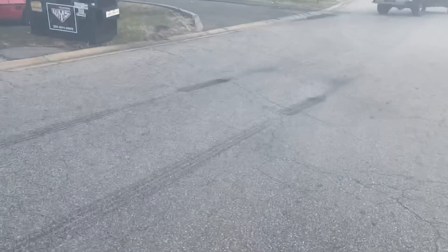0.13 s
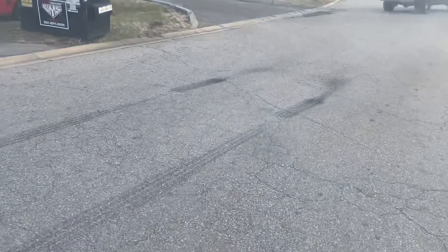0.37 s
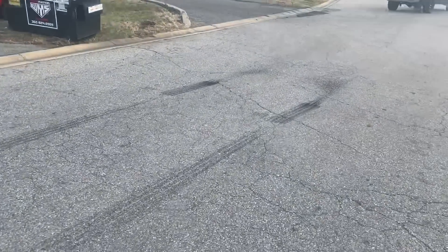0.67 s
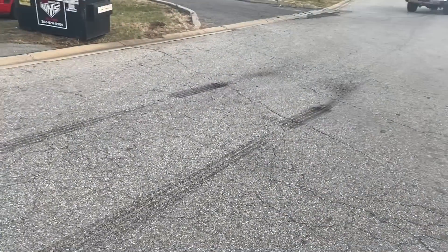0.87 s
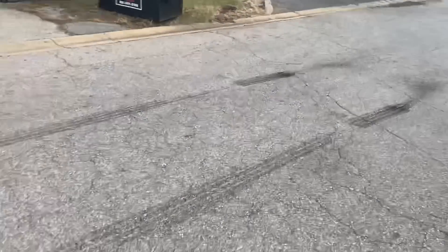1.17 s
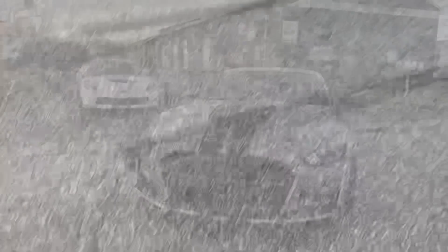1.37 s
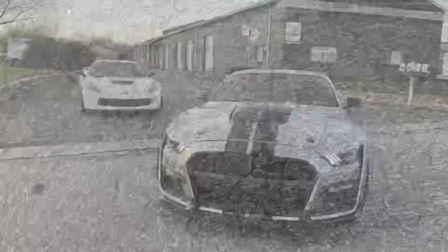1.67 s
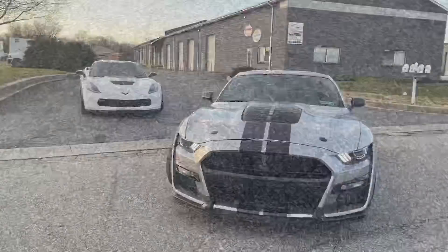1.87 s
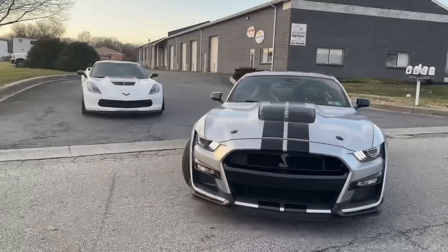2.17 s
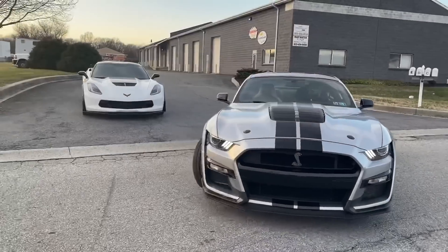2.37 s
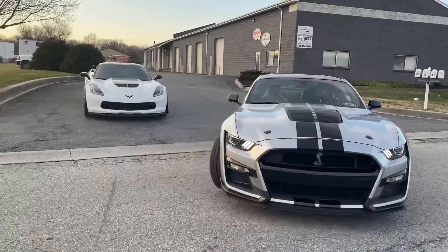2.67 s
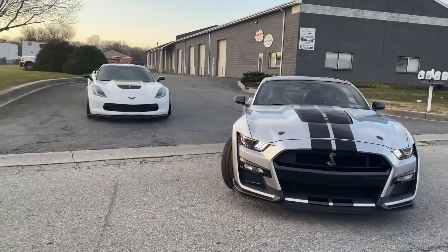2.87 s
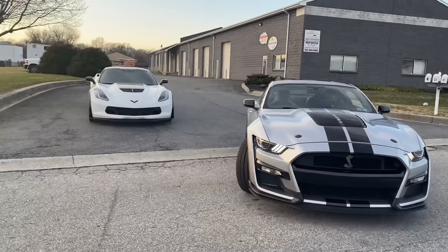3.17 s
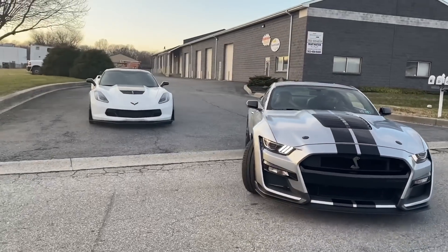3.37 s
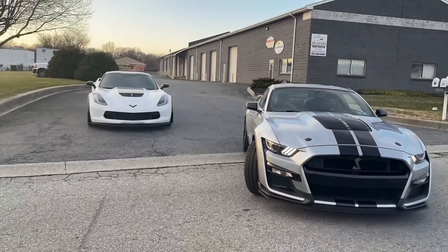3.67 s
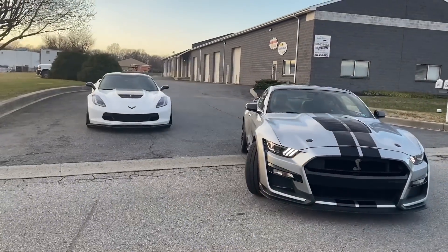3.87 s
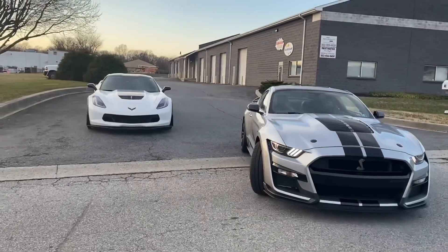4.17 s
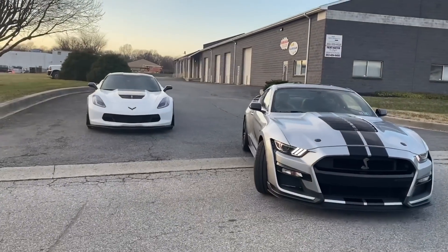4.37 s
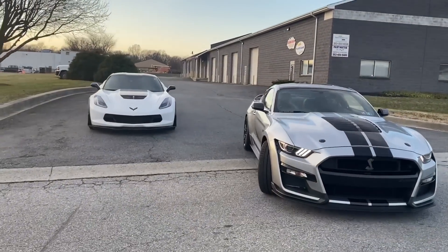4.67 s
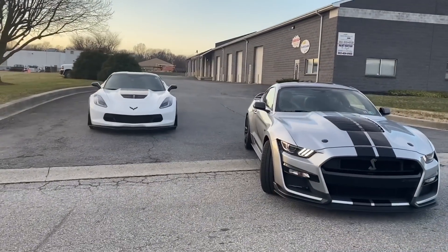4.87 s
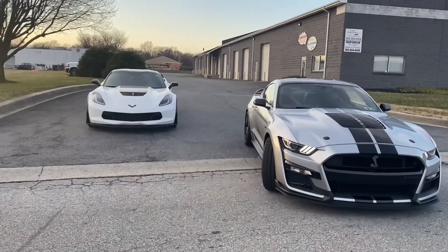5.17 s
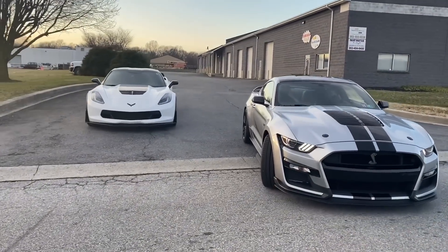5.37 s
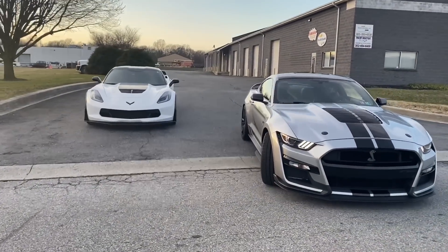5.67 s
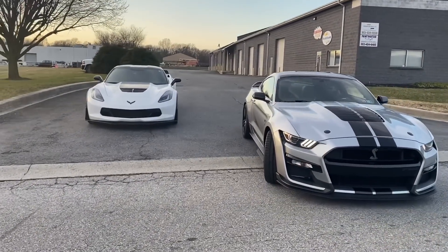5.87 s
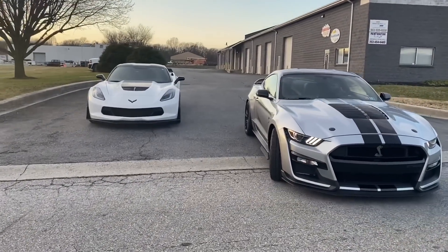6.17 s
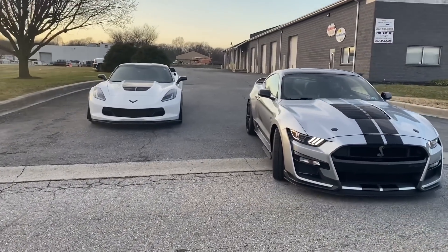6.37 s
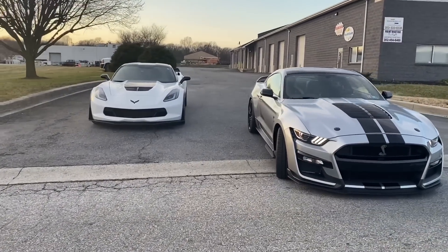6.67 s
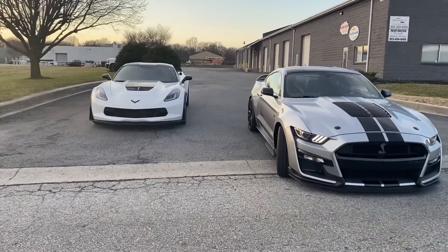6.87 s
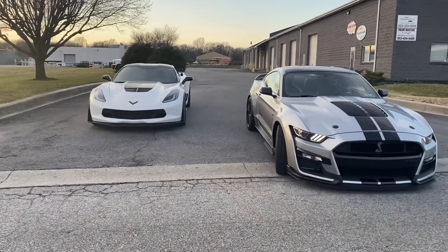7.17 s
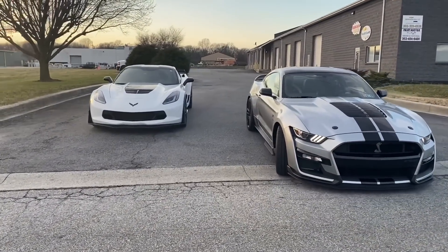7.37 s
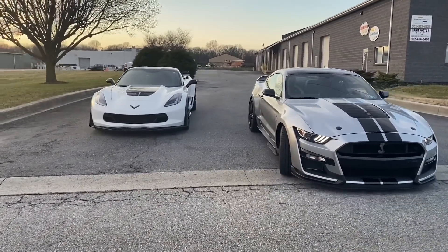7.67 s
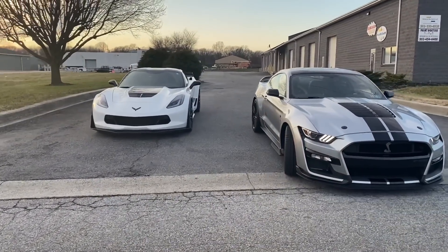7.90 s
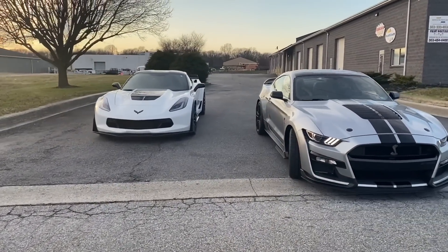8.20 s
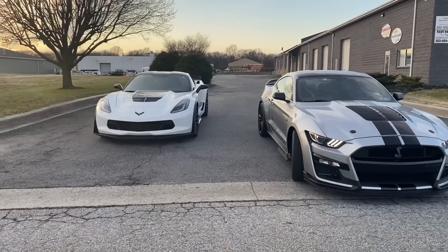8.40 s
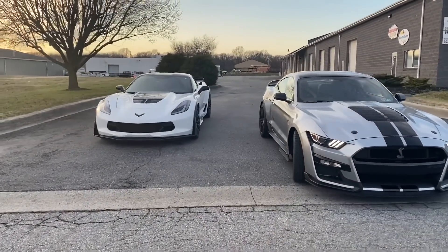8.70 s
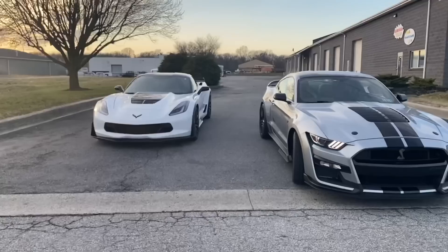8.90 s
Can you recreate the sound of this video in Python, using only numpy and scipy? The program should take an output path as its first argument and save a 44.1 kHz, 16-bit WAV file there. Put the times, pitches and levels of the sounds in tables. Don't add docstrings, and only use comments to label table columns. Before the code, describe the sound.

Outdoors on asphalt, a big engine fades up from near quiet, rumbles unevenly, revs in short muffled surges with exhaust pops between.

```python
import sys
import numpy as np
from scipy import signal
from scipy.fft import rfft, irfft, next_fast_len
from scipy.io import wavfile
from scipy.ndimage import uniform_filter1d

SR = 44100
rng = np.random.default_rng(int(sys.argv[2]) if len(sys.argv) > 2 else 0)


def boost(x):
    u = np.asarray(x, float) / 20
    return 10 ** u


def bounce(signal):
    frames = np.transpose(np.atleast_2d(signal))
    limited = np.clip(frames, -1, 1)
    pcm = np.round(limited * 32767).astype(np.int16)
    wavfile.write(sys.argv[1], SR, pcm)


N = 398663


def evened(x):
    return x / np.sqrt(np.mean(x ** 2) + 1e-20)


def read(points, hz):
    f, value = np.transpose(points)
    return np.interp(np.log(hz + 1), np.log(f + 1), value)


def curve(rows):
    s, value = np.transpose(rows)
    return np.interp(np.arange(N) / SR, s, value)


def drift(hz):
    lowpass = signal.butter(2, hz, fs=SR, output="sos")
    return evened(signal.sosfiltfilt(lowpass, rng.standard_normal(N)))


def colour(x, points):
    log_gain = np.log(boost(read(points, abs(np.fft.fftfreq(32768, 1 / SR)))))
    taps = np.fft.ifft(np.exp(np.conj(signal.hilbert(log_gain)))).real[:8192]
    return signal.oaconvolve(np.atleast_2d(x), taps[None], axes=1)[:, :N]


def resonate(x, hz, width):
    return signal.lfilter(*signal.iirpeak(hz, hz / width, SR), x)


def smoothed_luck(shape, bins, frames):
    luck = uniform_filter1d(rng.standard_normal(shape), size=bins, axis=0)
    return evened(uniform_filter1d(luck, size=frames, axis=1))


def noise(points, gate, patchy_db, ripple_db=0):
    hz, _, z = signal.stft(rng.standard_normal((2, N)) * gate, SR, nperseg=1024)
    patches = smoothed_luck(z.shape[1:], 10, 8)
    ripple = smoothed_luck(z.shape[1:], 2, 90)
    shape_db = read(points, hz)[:, None] + patchy_db * patches + ripple_db * ripple
    return evened(signal.istft(z * boost(shape_db), SR, nperseg=1024)[1][:, :N])


def wavering(lines, spread, sway_db):
    total = np.zeros(N)
    for hz, db in lines:
        level = np.sqrt(2) * boost(db + sway_db * drift(2.8))
        cycles = rng.random() + np.cumsum(hz * (1 + spread * drift(1.93))) / SR
        total += level * np.cos(2 * np.pi * cycles)
    return total


# (frequency [Hz], level [dB per Hz])
FAR_COLOUR = [(12, -54), (20, -24), (69, 2.5), (87, -8.5), (153, -2.5), (184, -25.5), (324, -15),
              (380, -30), (434, -13), (538, -27), (722, -28.5), (1080, -34), (1790, -40.5), (3410, -55),
              (12000, -66), (15600, -94), (22000, -120)]
# (time [s], level [dB])
FAR_SWELL = [(0.0, -62), (0.394, -63), (0.63, -59), (0.682, -64), (0.8, -65), (0.816, -62), (1.11, -63),
             (1.15, -62.5)]


def far_idle():
    highpass = signal.butter(4, 36, "high", fs=SR, output="sos")
    level_db = -55 + 0.64 * (curve(FAR_SWELL) + 59.5)
    return boost(level_db) * signal.sosfilt(highpass, noise(FAR_COLOUR, 1, 1.5))


def far_hum():
    return wavering([(82, -60.0)], 0.017, 1.78)


# (frequency [Hz], level [dB])
BEHIND = [(82, -30), (124, -42)]


def car_behind():
    return boost(1.1) * wavering(BEHIND, 0.0201, 4.1)


def near_fade():
    from_s, fade_s = 1.132, 1
    return np.clip((np.arange(N) / SR - from_s) / fade_s, 0, 1)


# (time [s], share of the way [0-1])
BACKING = [(0, 0.042), (4.2, 0.12), (6.2, 0.97), (9.04, 1)]


def backed_away():
    return curve(BACKING)


# (time [s], distance over the nearest [ratio])
DISTANCE = [(2.4, 0.93), (3.6, 1.35), (4.6, 1.52), (9.04, 1.83)]


def bay_distance():
    return curve(DISTANCE)


# (time [s], speed [firings per s])
COAST = [(1.113, 60.03), (1.63, 55.36), (2.05, 46.16), (2.651, 49.39), (3.195, 44.4), (3.859, 49.16),
         (4.5, 47.13), (4.73, 50.76), (5.39, 58.52), (5.54, 58.9), (5.728, 52.08), (6.483, 56.5),
         (6.866, 51.8), (7.25, 51.39), (7.81, 47.81), (8.59, 58.01), (8.733, 62.66), (8.84, 60.33)]


def coasting():
    return curve(COAST)


# (start [s], length [s], surge [firings per s])
BLIPS = [
    (4.669, 0.72, 11.332),
    (5.73, 0.67, 12.363),
    (7.888, 0.756, 13.693),
    (8.871, 0.75, 7.952),
]


def surge():
    t = np.arange(N) / SR
    extra = np.zeros(N)
    for start, length, top in BLIPS:
        extra += top * np.sin(np.pi * np.clip((t - start) / length, 0, 1) ** 1.04)
    return extra


# (start [s], opening [s], held until after start [s], closing [s], share of full load [ratio])
PEDAL = [
    (4.69, .2, 0.64, 0.035, 1),
    (5.8, 0.11, .48, .1, 0.94),
    (7.92, 0.37, 0.51, 0.19, 1.08),
    (8.93, .12, .4, .1, 0.62),
]


def pedal():
    t = np.arange(N) / SR
    load = np.zeros(N)
    for start, opening, held, closing, share in PEDAL:
        rise = (t - start) / opening
        fall = (start + held + closing - t) / closing
        load += share * np.clip(np.minimum(rise, fall), 0, 1)
    return load


# (frequency [Hz], level [dB])
WHINE = [(605, -47.5), (910, -49), (1173, -63), (1211, -60.5)]


def whine():
    return boost(1.1 - 6.5 * backed_away()) * wavering(WHINE, 0.00498, 2.2)


# (frequency [Hz], level [dB])
HISS_TILT = [(750, -2.5), (2000, 1.5), (3500, 0.5), (5900, 2)]
# (frequency [Hz], level [dB per Hz])
HISS_NEAR = [(440, -21), (750, 3), (884, 0.5), (931, -5), (1030, -8.5), (1210, -1.5), (1410, -7),
             (1540, -5.5), (1750, -9.5), (1890, -11), (2130, -15.5), (3040, -14), (3220, -13.5),
             (4360, -20.5), (5900, -22), (7670, -33), (13000, -120)]
# (frequency [Hz], level [dB per Hz])
HISS_AWAY = [(440, -22), (750, -3), (839, -4), (923, 1), (1040, -6.5), (1510, -7.5), (1750, -13),
             (1890, -10.5), (2360, -14), (2640, -15), (2910, -16), (3400, -14.5), (4710, -22.5),
             (5230, -25), (5900, -26), (7670, -62), (13000, -120)]
# (frequency [Hz], level [dB per Hz])
FIZZ = [(5200, -21), (6100, -2.5), (7000, 0.5), (8500, -2), (10000, -2), (12000, -4), (13500, -5),
        (15300, -6.5), (15700, -42)]


def engine_bay(firings, extra):
    far_db = -20 * np.log10(bay_distance())
    blip = extra / 12
    hiss_db = -34.74 + far_db + 2.5 * blip
    fizz_db = -51 + 0.69 * far_db + 5 * blip
    throb = boost(0.45 * drift(150)) * (1 + 0.027 * np.cos(2 * np.pi * firings))
    near, far = ([(hz, db + read(HISS_TILT, hz)) for hz, db in shape] for shape in (HISS_NEAR, HISS_AWAY))
    away = np.clip(backed_away(), 0, 1)
    hiss = np.sqrt(1 - away) * noise(near, throb, .9, 1.3)
    hiss = hiss + np.sqrt(away) * noise(far, throb, .9, 1.3)
    fizz = noise(FIZZ, boost(0.57 * drift(22)), 1.0, 0.54)
    return boost(hiss_db) * hiss + boost(fizz_db) * fizz


# (time [s], peak level [dB])
POPS = [(3.151, -20), (4.403, -20), (5.17, -18), (5.217, -18), (6.153, -16), (6.72, -21), (7.026, -16),
        (7.182, -15), (7.494, -23), (7.831, -28), (8.001, -17), (8.138, -15), (8.268, -11)]


def pops():
    out, t = np.zeros((2, N)), np.arange(600) / SR
    for s, db in POPS:
        knock = boost(db) * np.sin(2 * np.pi * rng.uniform(550, 800) * t) * np.exp(-t / .0014)
        part = out[:, round(s * SR):][:, :len(t)]
        part += knock[:part.shape[1]]
    return .75 * colour(out, [(200, -20), (500, 0), (900, -2), (2000, -10), (6000, -50)])


# (speed [firings per s], first, second, third firing multiple [dB], lope [dB])
BY_SPEED = [(44.3, -41, -14.6, -21, -20.5), (45.3, -31.5, -12.8, -19.5, -20.5),
            (48.9, -30, -13.5, -21.5, -20.5), (51.6, -25.5, -13.5, -27, -18), (55.4, -22, -16, -27, -16.5),
            (59, -19.5, -16, -34, -16), (59.3, -19.5, -19.5, -44, -15), (69.3, -17, -18.5, -44, -15.5)]
LOADED_DB = [4.1, 5.1, 4.3, .3]
BACKED_DB = [1.5, -1.1, -2.5, -1.6]


def multiples(rate, load):
    hz, *levels = np.transpose(BY_SPEED)
    away = backed_away()
    return [np.interp(rate, hz, db) + loaded_db * load + backed_db * away
            for db, loaded_db, backed_db in zip(levels, LOADED_DB, BACKED_DB)]


def exhaust_boom(firings, faster, first_db, second_db, third_db):
    angle = 2 * np.pi * firings
    boom = boost(first_db) * np.cos(angle + 2.85 - .07 * faster)
    boom += boost(second_db + 0.14 * drift(10)) * np.cos(2 * angle)
    boom += boost(third_db + 1.1 * drift(12)) * np.cos(3 * angle - 1.1 + .19 * faster)
    boom += boost(second_db - 28 + 2.3 * drift(6)) * np.cos(4 * angle)
    return boost(0.16) * np.sqrt(2) * boom


def blows(firings, excess, luck):
    firing = firings.astype(int)
    fires = np.diff(firing, prepend=firing[0])
    return fires * (np.take(excess, firing % len(excess)) + luck[firing])


# (frequency [Hz], gain [dB])
PIPE = [(20, -27), (40, -24), (55, -19), (66, -5), (76, -2), (100, -2), (112, -5.5), (124, -6), (138, -3),
        (152, -5), (172, -14), (210, -18), (250, -40), (900, -100)]
IDLE_EXCESS = [-1.35, -.8, -1, 2.1, .85, .35, -1.25, 1.1]
LOAD_EXCESS = [-.5, -1.2, -1.2, .95, .5, -.25, -.45, 2.15]


def exhaust_lope(firings, faster, lope_db, luck):
    load = np.clip(faster / 6, 0, 1)
    clicks = (1 - load) * blows(firings + .15, IDLE_EXCESS, .35 * luck)
    clicks += load * blows(firings + .15, LOAD_EXCESS, .45 * luck)
    turbulence = .011 * rng.standard_normal(N)
    lope = colour(clicks + turbulence, PIPE)[0]
    lope /= np.sqrt(uniform_filter1d(lope ** 2, size=20000) + 1e-12)
    return boost(lope_db - 2.0) * lope


# (frequency [Hz], width [Hz], level [dB])
MUFFLER = [(183, 45, -3), (273.7, 24.3, -2), (327, 36, -5.5), (410.7, 15.4, 0), (453.3, 31.4, 1.5),
           (494.6, 45, -2.5), (593.5, 35, -5), (696, 20.4, -6.5)]


def muffler_ring(blast):
    dulled_db = -3.5 * np.maximum(np.arange(N) / SR - 6.7, 0)
    ring = np.zeros((2, N))
    for k, (hz, width, db) in enumerate(MUFFLER):
        level_db = db + dulled_db * np.clip(hz / 600 - 1, 0, 1) / .16
        ring += (-1) ** k * boost(level_db) * resonate(blast, hz, width)
    outlet = [(130, -20), (190, 2), (250, -1), (720, 1), (900, -7.0), (2000, -45), (5000, -83)]  # (Hz, dB)
    return evened(colour(ring, outlet))


# (frequency [Hz], level [dB per Hz])
RASP = [(110, -2.5), (190, -1), (226, -4.5), (322, -4.5), (466, -10), (550, -7.5), (598, -3.5), (926, -20),
        (1000, -25.5), (1300, -37.5), (2200, -120)]


def exhaust_rasp(firings, faster, pushed, luck):
    firing = firings.astype(int)
    strength = boost(1.2 * np.take(LOAD_EXCESS, firing % len(LOAD_EXCESS)) + 1.2 * luck[firing])
    flow = noise(RASP, strength * (0.66 + np.exp(-(2 * firings % 1) / 0.31)), 0.32, 0.59)
    puff = 0.3 + np.exp(-((firings + .3) % 1) / 0.22)
    ring = muffler_ring(rng.standard_normal((2, N)) * strength * puff)
    throttle = np.clip(faster / 40 + 0.38 * pushed, 0, 1)
    rasp = (.8 - 0.71 * throttle) * flow + (0.59 + 0.11 * throttle) * ring
    turned_db = 2.5 * (bay_distance() - 1.5)
    return boost(-29.5 + 0.3254 * faster + 6 * pushed + turned_db) * rasp


def exhaust(firings, rate):
    pushed, faster = pedal(), rate - 48
    first_db, second_db, third_db, lope_db = multiples(rate, pushed)
    luck = rng.standard_normal((int(firings[-1]) + 2, 2))
    boom = exhaust_boom(firings, faster, first_db, second_db, third_db)
    lope = exhaust_lope(firings, faster, lope_db, luck[:, 0])
    return boom + lope, exhaust_rasp(firings, faster, pushed, luck[:, 1])


# (frequency [Hz], likeness [0-1])
SAME = [(60, 0.5), (150, 0.88), (290, 1), (640, 0.88), (1400, 0.83), (2800, 0.52), (5000, 0.46),
        (8000, 0.68), (12000, 0.74)]
# (frequency [Hz], phase [radians])
LEAD = [(20, 0), (1000, 0), (1720, -.3), (2840, .6), (4220, .7), (6000, 1.6), (7800, 2), (8600, 3.14),
        (9200, 4.8), (9730, 6.3), (10800, 5.8), (11700, 3.14), (12400, 3.14), (13200, .3), (14500, -.1),
        (15100, -1.7)]
# (frequency [Hz], level [dB])
LEAN = [(60, -.4), (125, -.6), (250, -1.2), (380, -1.5), (700, .3), (1290, -1.3), (2370, -2.5), (4380, .4),
        (14900, -.1)]


def ports(mono, pair):
    size = next_fast_len(N + 16384)
    hz = np.fft.rfftfreq(size, 1 / SR)
    same = np.clip(read(SAME, hz), 0, 1)
    both, a, b = rfft(mono, size), rfft(pair[0], size), rfft(pair[1], size)
    turn = boost(read(LEAN, hz) / 2) * np.exp(.5j * read(LEAD, hz))
    left = (both + a) * turn
    right = (both + same * a + np.sqrt(1 - same ** 2) * b) / turn
    return irfft([left, right], size)[:, :N]


def scene():
    extra = surge()
    rate = coasting() + extra
    firings = 5.358 + np.cumsum(rate) / SR
    boom, rasp = exhaust(firings, rate)
    mono = near_fade() * (boom + whine() + car_behind()) + far_hum()
    pair = near_fade() * (rasp + engine_bay(firings, extra) + pops()) + far_idle()
    return ports(mono, pair)


def roll_off(x):
    return signal.sosfilt(signal.butter(12, 15540, fs=SR, output="sos"), x)


def record(dry):
    limited = 1.15 * np.tanh(dry * 1.05 / 1.15)
    return roll_off(limited)


dry = scene()
out = record(dry)
bounce(out)
```